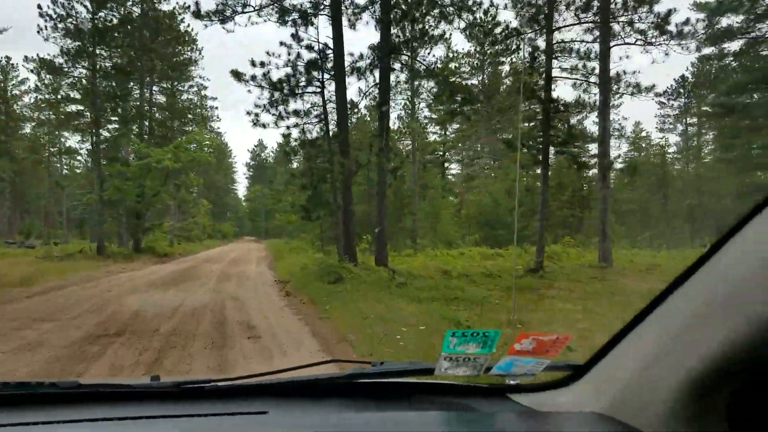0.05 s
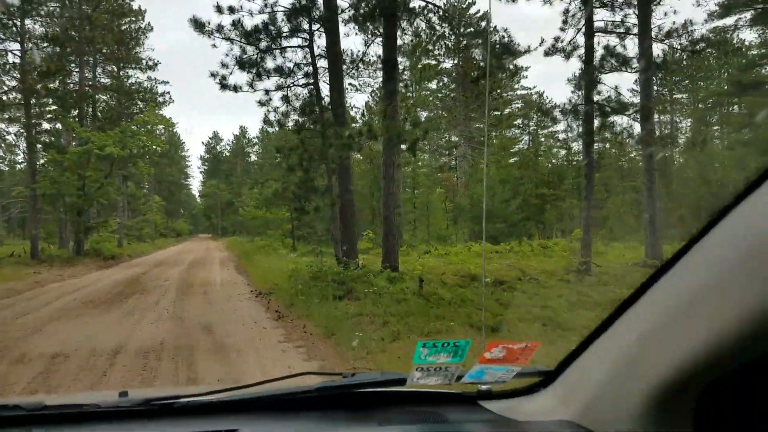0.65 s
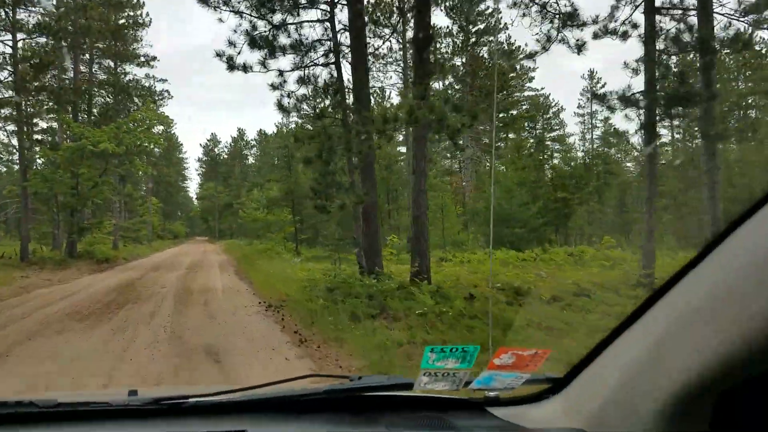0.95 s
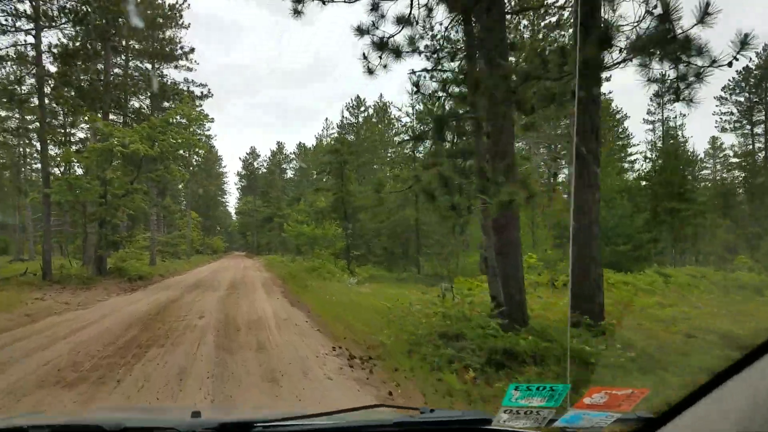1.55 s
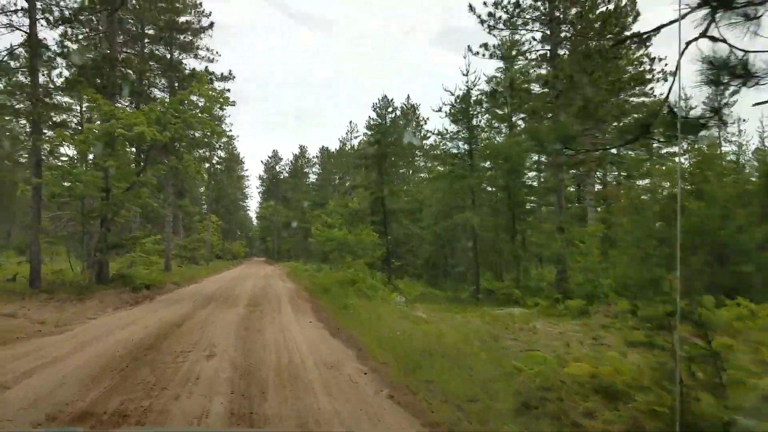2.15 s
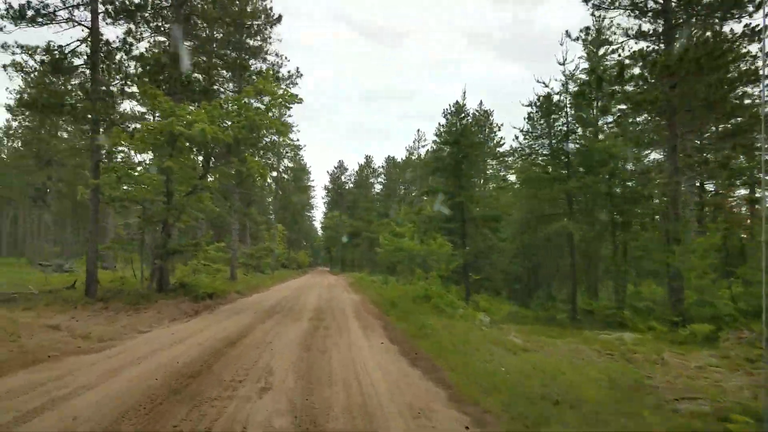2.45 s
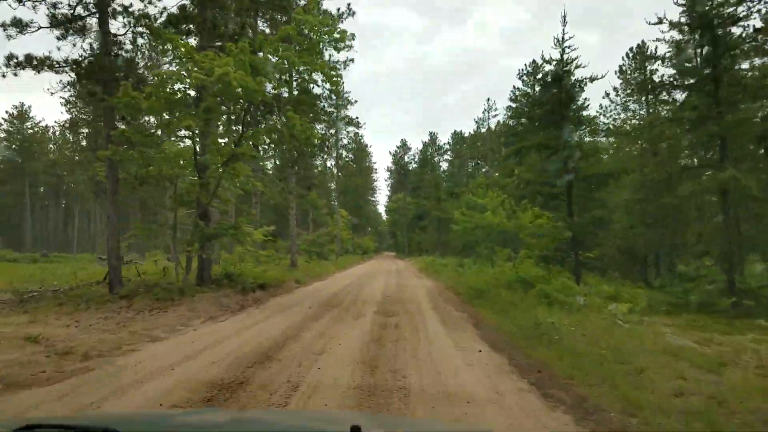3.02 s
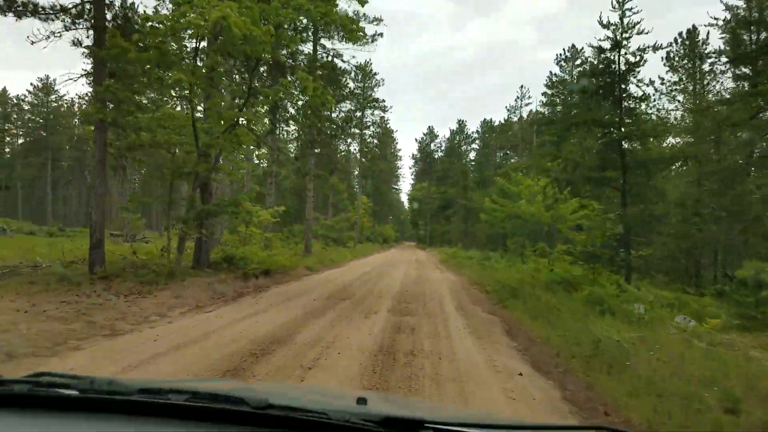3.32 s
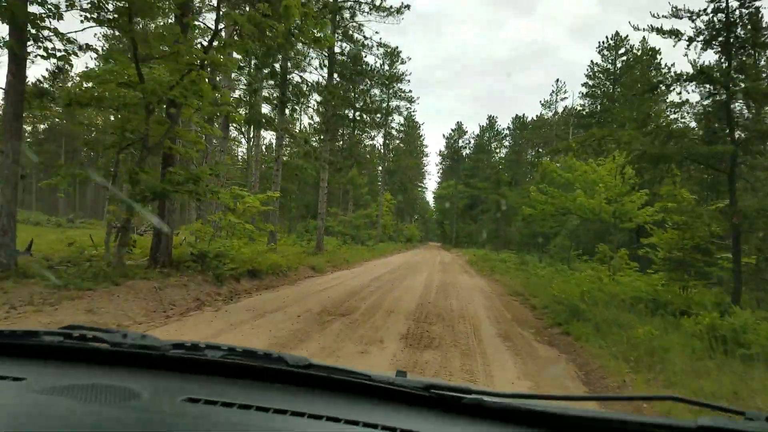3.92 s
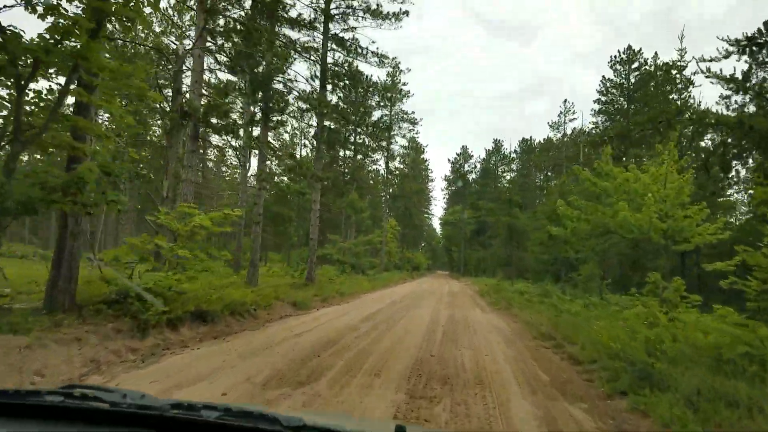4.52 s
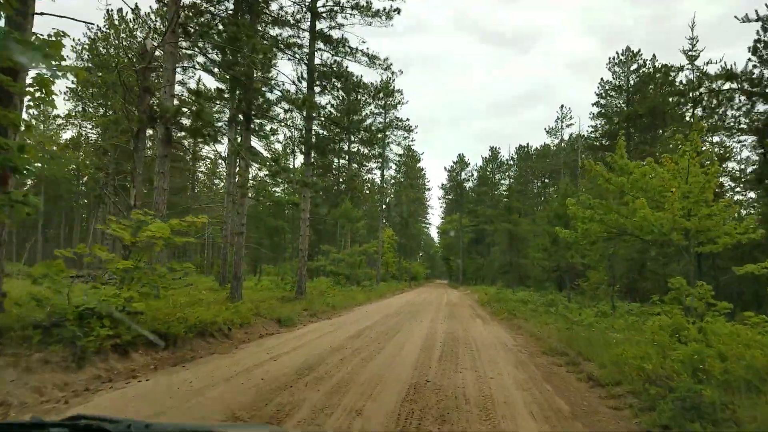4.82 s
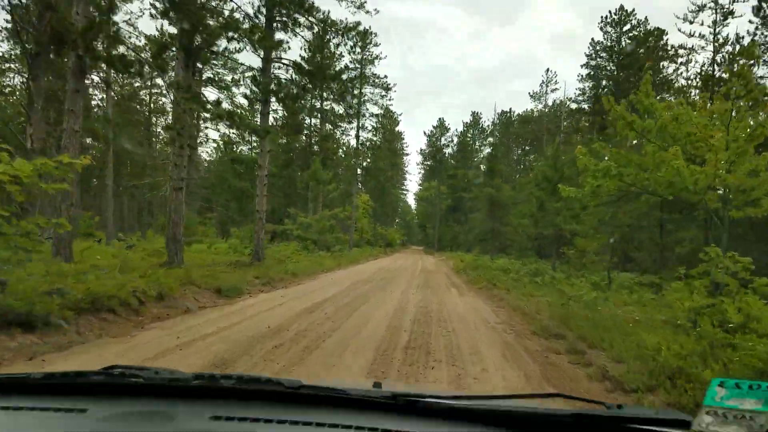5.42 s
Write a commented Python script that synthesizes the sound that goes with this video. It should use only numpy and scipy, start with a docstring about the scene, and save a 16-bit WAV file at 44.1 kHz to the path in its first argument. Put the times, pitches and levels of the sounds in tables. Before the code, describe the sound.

Heard from inside a moving car, a continuous low boom swells and dips as the tyres run over dirt and grit. Ruts thump through the body throughout, setting off brief plastic rattles and small ticks. The low drone is strongest in the first half, and a faint squeak comes near the middle. Later a loose panel knocks sharply a few times and small metal pieces clink softly. The microphone sits close behind the windscreen.

```python
"""Inside a car rolling along a rough dirt road, heard from a phone behind the windscreen.
The road forces the body into vibration and excites the cabin's air modes, which boom over the drive
train's drone; the tyres roar and crunch on grit. Bumps are impulses that thud and clunk through the
suspension. Loose trim knocks, rattles and squeaks, and small parts tick and clink over a faint hiss."""
import sys
import numpy as np
from scipy import signal
from scipy.fft import rfft, irfft
from scipy.io import wavfile

SR = 44100
rng = np.random.default_rng(int(sys.argv[2]) if len(sys.argv) > 2 else 0)


def dump_mix(stems):
    """Bounce the given channels to the path in sys.argv[1] as a 16-bit WAV at rate SR."""
    frames = np.atleast_2d(stems).T  # one column per channel
    limited = np.clip(frames, -1, 1)  # hard clip at full scale
    pcm = np.round(limited * 32767).astype(np.int16)
    wavfile.write(sys.argv[1], SR, pcm)


N = 250047
TIME = np.arange(N) / SR
FREQS = np.maximum(np.fft.rfftfreq(2 * N, 1 / SR), 1)
TOP_HZ = 15750

# How hard the road shakes the car. Each row: time in seconds, drive in dB.
ROAD_DRIVE = [(0, -28.5), (0.221, -20), (0.701, -26), (0.949, -25), (1.219, -23.5), (1.551, -25),
              (1.751, -22), (2.3, -19), (2.501, -22.5), (2.9, -20), (3.299, -24.5), (3.55, -27.5),
              (3.72, -19.5), (3.951, -24.5), (4.32, -20.5), (4.6, -25.5), (5.001, -26.5), (5.449, -32.5)]
# Dips in the road. Each row: time of the peak in seconds, relative level in dB, half length in seconds.
ROAD_DIPS = [(0.189, -20, 0.038), (0.309, -18, 0.0071), (0.466, -18.5, 0.027), (1.023, -19.5, 0.015),
             (1.074, -16, 0.0076), (1.382, -14, 0.024), (1.492, -10.5, 0.008), (1.631, -14.5, 0.009),
             (1.705, -14.0, 0.0095), (1.803, -12.5, 0.0067), (1.97, -13, 0.006), (2.092, -25, 0.0071),
             (2.18, -16, 0.011), (2.29, -11, 0.0044), (2.581, -16.5, 0.0079), (2.654, -12.5, 0.0087),
             (2.74, -13, 0.01), (2.791, -16, 0.0063), (2.914, -9, 0.0052), (2.98, -10.5, 0.0074),
             (3.13, -16, 0.0082), (3.263, -20.5, 0.026), (3.374, -17.5, 0.037), (3.68, -13, 0.024),
             (3.958, -13, 0.0064), (4.12, -15, 0.014), (4.239, -17, 0.0025), (4.365, -33, 0.0064),
             (4.42, -16.5, 0.012), (4.493, -14.5, 0.0058), (4.689, -11.5, 0.0079), (4.945, -20.5, 0.013),
             (5.081, -19.5, 0.0086), (5.359, -21, 0.022)]
# Tyres on dirt. Each row: time in seconds, relative levels of roar and of grit in dB.
TYRE_LEVELS = [(0, -52.5, -49), (.13, -50.5, -67.5), (.3, -49.5, -58.5), (0.741, -51, -64),
               (1.17, -49.5, -57), (1.37, -49.5, -63.5), (1.75, -48.5, -60.5), (2.45, -50.5, -63.5),
               (2.78, -47.5, -65), (3.199, -52, -65), (3.5, -50.5, -62), (3.75, -51.5, -61.5),
               (4.0, -53.5, -66), (4.28, -51, -58.5), (4.55, -52.5, -64), (4.72, -51.5, -61),
               (4.95, -53, -66), (5.249, -53, -61.5), (5.67, -54.5, -61)]
# Balance of the two microphones. Each row: frequency in Hz, left minus right in dB.
BALANCE = [(120, -2.5), (250, -1.6), (500, -2), (1000, -2.5), (2000, -4), (4500, -5.5), (8000, -1.5),
           (12000, 1.5)]


def cabin_boom():
    """Cavity resonance: the road excites air modes that throb with the drone and surge at each dip."""
    # The drive train's drone. Each row: time in seconds, pitch in Hz, share of the boom's power.
    drone_curve = [(0, 110, .3), (.9, 107, .15), (1.35, 108.5, .65), (1.65, 110, .55), (2.0, 107.5, .55),
                   (2.35, 107.5, .65), (2.7, 107, .3), (3.2, 106, .06), (5.67, 106, .04)]
    # Each row: frequency in Hz, width in Hz, gain in dB.
    air_modes = [(83.34, 23.04, 3.5), (99.4, 23.8, 0.5), (109.2, 12.5, -1), (131.1, 17.6, -10.5)]
    times, hz, shares = np.transpose(drone_curve)
    waver_hz, throb_db = 3.2, 2
    pitch = np.interp(TIME, times, hz) + waver_hz * walk(rate=16)
    drone = np.sin(2 * np.pi * np.cumsum(pitch) / SR)
    pan = by_freq(BALANCE)[0] ** np.array([[0.5], [-0.5]])
    air = steady(cabin(grains(rate=340, spread_db=1.5), resonances(air_modes)), span_s=0.94)
    share = np.interp(TIME, times, shares)
    ringing = steady(np.sqrt(1 - share) * air + np.sqrt(share) * unit(drone * pan), span_s=0.078)
    rolling = shaken(ROAD_DRIVE, level_db=-23, slope=0.91) * undb(throb_db * walk(rate=22))
    return ringing * np.hypot(rolling, swells(ROAD_DIPS))


def body_shudder():
    """Forced vibration: the uneven road heaves the body in its lowest modes."""
    # Each row: frequency in Hz, width in Hz, gain in dB.
    modes = [(18.6, 26.7, -8.5), (28, 9.4, 2.5), (34, 8, -5), (49.8, 7, -1.5)]
    # Each row: time in seconds, relative level in dB.
    levels = [(0, -28), (.3, -18), (.8, -28), (1.15, -19.5), (1.45, -25), (1.75, -19.5), (2.35, -24.5),
              (2.62, -22.5), (3.0, -27), (3.7, -20), (4.02, -26), (4.18, -17), (4.45, -22.5), (5.3, -26),
              (5.67, -31.5)]
    return undb(-0.7) * steady(cabin(noise(), resonances(modes)), span_s=0.88) * gains(levels)[0]


def floor_drumming():
    """Structure-borne sound: random road impacts drum on the floor, a little harder at dips."""
    # Each row: frequency in Hz, gain in dB.
    spectrum = [(100, -27.5), (135, 2.5), (150, 1), (162, -2), (180, 2), (225, -7), (270, -11), (400, -38)]
    drumming = steady(cabin(grains(rate=750, spread_db=2.5), colour(spectrum)), span_s=0.93)
    rolling = shaken(ROAD_DRIVE, level_db=-31.5, slope=0.99)
    return drumming * np.hypot(rolling, undb(-23) * swells(ROAD_DIPS))


def arch_thrum():
    """Forced vibration: the rolling tyres drive the wheel arches, which follow the level of the roar."""
    # Each row: frequency in Hz, gain in dB.
    spectrum = [(200, -33), (280, -0.5), (320, 1.5), (375, -1.5), (450, -6), (560, -12), (800, -27)]
    thrum = steady(cabin(grains(rate=1200, spread_db=2.5), colour(spectrum)), span_s=0.96)
    return thrum * shaken(TYRE_LEVELS, level_db=-43, slope=2)


def tyres():
    """Shot noise: tread pounds dirt and crushes grit, modulated by the road's ripples and lumps."""
    # Each row of both: frequency in Hz, gain in dB.
    roar_spectrum = [(380, -18.5), (560, 2), (720, 0.5), (900, -6), (1200, -9.5), (1600, -18.5),
                     (3000, -26.5)]
    grit_spectrum = [(800, -16.5), (1400, 6.5), (1900, 4.5), (2500, 3.5), (3100, -4.5), (4300, -12),
                     (5600, -29), (7200, -37.5), (14000, -42)]
    roar_gain, grit_gain = gains(TYRE_LEVELS)
    flutter_db = walk(rate=46) + walk(rate=11)  # ripples and lumps
    roar = unit(cabin(grains(rate=4000, spread_db=0), colour(roar_spectrum))) * undb(flutter_db)
    grit = unit(cabin(grains(rate=3500, spread_db=1.8), colour(grit_spectrum))) * undb(flutter_db / 2)
    return undb(2.5) * (roar * roar_gain + grit * grit_gain)


def rut_thuds():
    """Impulse response: each wheel that hits a rut rings the modes of the body."""
    # Each row: start in seconds, impulse in dB, contact time in seconds.
    bumps = [(.2, 2, 0.00093), (1.186, 6.5, 0.0013), (1.385, 5, 0.0007), (1.675, 2, .00083),
             (2.453, 7, 0.0013), (2.598, 7.5, 0.00067), (2.782, -3, 0.0022), (2.85, 5.5, 0.00061),
             (3.11, 12, 0.0022), (3.45, 9, 0.0021), (3.625, 4.5, 0.00055), (3.72, 10, 0.0035),
             (3.774, 9.5, 0.0057), (4.07, 10.5, 0.004), (4.193, 6.5, 0.0018), (4.226, 8.5, 0.0019),
             (4.27, 7, 0.002), (4.335, 0.5, 0.0025), (4.652, 4.5, .0022), (4.935, 5.5, 0.0014),
             (5.042, 5.5, 0.0018), (5.131, -0.5, .0012), (5.352, -0.5, 0.0013), (5.611, 10, 0.0029)]
    # Each row: frequency in Hz, width in Hz, gain in dB.
    modes = [(107, 52, 8), (170, 31, -0.5), (218, 13, 7), (258, 120, -2), (313, 42, 3), (390, 100, -11.5),
             (475, 300, -13.5), (700, 110, -19)]
    return strikes(bumps, resonances(modes), push)


def suspension():
    """Modal ringing: the suspension clunks in its own modes and jolts those of the hollow body."""
    # Each row of both: start in seconds, level in dB, 60 dB decay time in seconds.
    clunks = [(1.637, -25.5, 0.1), (1.725, -27.5, 0.039), (2.135, -31, 0.082), (2.453, -34.5, 0.074),
              (2.605, -34, .09), (2.703, -29, 0.062), (2.895, -29.5, 0.056), (3.628, -35, 0.16),
              (5.362, -31, 0.074)]
    jolts = [(.205, -41, 0.13), (1.372, -42, 0.064), (1.642, -37, .1), (2.138, -42, 0.083),
             (2.599, -37, .08), (2.842, -48.5, 0.046), (3.452, -37.5, .07), (4.1935, -24, 0.048),
             (4.216, -36.5, 0.044), (4.2935, -28, 0.034), (4.457, -43, 0.07), (4.634, -44, .06),
             (4.943, -47, 0.074), (5.352, -37.5, 0.061), (5.362, -37, 0.079)]
    # Each row of both: frequency in Hz, width in Hz, gain in dB.
    clunk_modes = [(288, 84, 0), (387, 26, 4), (434, 67, -9)]
    body_modes = [(415, 57, 6.5), (550, 110, -2.5), (652, 90, -2.5), (740, 130, -0.5), (890, 130, -4),
                  (1120, 320, -6)]
    return strikes(clunks, resonances(clunk_modes), slap) + strikes(jolts, resonances(body_modes), slap)


def gravel_spray():
    """Impact excitation: showers of gravel ring the liner of the wheel arch."""
    # Each row: start in seconds, level in dB, length in seconds.
    sprays = [(.17, -53.5, 0.15), (.27, -48.5, 0.13), (.64, -57, 0.021), (1.02, -50.5, 0.092),
              (1.14, -49.5, 0.1), (1.27, -51, 0.085), (1.6, -54, 0.076), (1.745, -53, .025),
              (2.598, -53, 0.012), (4.325, -50.5, 0.008), (4.69, -57.5, 0.058), (5.352, -46, 0.015)]
    # Each row: frequency in Hz, width in Hz, gain in dB.
    modes = [(804, 300, -5), (1010, 110, 3), (1330, 160, -5.5), (1760, 210, -12)]
    return strikes(sprays, resonances(modes), clatter)


def panel_knocks():
    """Plate vibration: a loose panel knocks, giving a broadband contact and a modal ring."""
    # Each row: start in seconds, level in dB, 60 dB decay time in seconds.
    knocks = [(.245, -45, 0.11), (.318, -40.5, 0.14), (.595, -40, 0.085), (1.098, -36.5, 0.063),
              (1.186, -44.5, 0.061), (2.225, -39.5, 0.092), (2.597, -43.5, 0.07), (4.194, -27.5, 0.018),
              (4.198, -22, 0.048), (4.2165, -38, 0.067), (4.295, -34.5, 0.025), (4.2995, -32, 0.028),
              (4.329, -35.5, 0.03), (5.071, -43, 0.06), (5.149, -43, .04), (5.354, -38.5, 0.09)]
    # The bare contact. Each row: frequency in Hz, gain in dB.
    spectrum = [(90, -14.5), (190, 21), (300, -10.5), (440, -2), (600, -8), (760, 4), (900, 2),
                (1180, -1.5), (1700, -10.5), (2300, -10.5), (2900, -34.5), (5000, -29), (7500, -46),
                (15000, -37)]
    # Each row: frequency in Hz, width in Hz, gain in dB.
    modes = [(200, 60, 12.5), (454, 150, 3), (710, 99, -7.5), (910, 170, -6), (1200, 230, -0.5),
             (1340, 220, -7), (1650, 170, -8), (1980, 180, -9), (2380, 220, -7.5)]
    return strikes(knocks, colour(spectrum), slap) + undb(-1.5) * strikes(knocks, resonances(modes), slap)


def cover_rattle():
    """Shell resonance: rapid contacts ring a hollow plastic cover."""
    # Each row: start in seconds, level in dB, length in seconds.
    bursts = [(1.035, -55, .02), (1.155, -58, 0.047), (2.18, -55, .055), (2.555, -65.5, .014),
              (2.625, -54.5, 0.042), (2.668, -53.5, 0.076), (2.726, -55, 0.014), (2.81, -57, 0.012),
              (2.88, -54.5, 0.015), (2.988, -51.5, 0.013), (3.147, -56, 0.022), (4.232, -62, .02),
              (4.34, -58, 0.008), (4.387, -52, 0.0067), (4.688, -57, 0.011), (4.757, -60, .02)]
    # Each row: frequency in Hz, width in Hz, gain in dB.
    modes = [(1390, 300, -1), (1940, 380, 3.5), (2140, 160, 3), (2420, 340, -4), (3240, 320, -14.5),
             (3620, 370, -10)]
    return strikes(bursts, resonances(modes), buzz)


def trim_chatter():
    """Intermittent contact: loose trim chatters in short broadband bursts."""
    # Each row: start in seconds, relative level in dB, length in seconds.
    bursts = [(.11, -58, 0.012), (.236, -56, 0.038), (.353, -54.5, 0.022), (.425, -62, 0.013),
              (1.093, -56, 0.024), (1.14, -57, 0.03), (1.24, -59, .02), (1.652, -53.5, 0.014),
              (1.739, -54, 0.019), (1.862, -64.5, 0.015), (2.207, -58.5, 0.024), (2.726, -58.5, 0.022),
              (3.567, -59, 0.0063), (3.718, -62, 0.012), (5.148, -57.5, 0.0058)]
    # Each row: frequency in Hz, gain in dB.
    spectrum = [(300, -29), (700, 0.5), (1300, 6), (1600, -1), (1950, -1.5), (2250, -3), (2600, -3.5),
                (3050, -4), (3600, -6), (4100, -15.5), (5500, -20.5), (7500, -30), (15000, -24.5)]
    return undb(5) * strikes(bursts, colour(spectrum), clatter)


def small_ticks():
    """High-frequency resonance: small hard parts tick, each at its own pitch."""
    # Each row: start in seconds, level in dB, length in seconds, ring frequency in Hz.
    ticks = [(.096, -67, .003, 4680), (.1116, -74, 0.0029, 4370), (.195, -74.5, 0.014, 13700),
             (.238, -73, 0.0088, 13000), (.318, -72, 0.0034, 10000), (.566, -76, .002, 13500),
             (.868, -73, 0.0084, 12500), (1.335, -75, .012, 5900), (1.444, -76, .0015, 12500),
             (1.722, -72, 0.0042, 5870), (1.736, -72, .008, 15000), (1.789, -72.5, 0.011, 13000),
             (1.82, -73.5, 0.006, 9950), (2.251, -74, .016, 11400), (2.66, -71, 0.046, 9640),
             (2.783, -73, .004, 12900), (3.338, -77, 0.013, 5100), (3.415, -74, 0.034, 12600),
             (3.567, -69, 0.0051, 6000), (3.638, -70, 0.014, 12200), (3.93, -74, 0.039, 11300),
             (3.995, -70, .038, 12800), (4.194, -61.5, 0.0053, 5500), (4.204, -66, 0.0085, 14300),
             (4.217, -75, 0.0032, 9500), (4.294, -68, 0.0051, 5470), (4.555, -74, 0.0088, 12200),
             (4.609, -71.5, 0.0056, 14000), (4.64, -73.5, 0.016, 12930), (5.082, -74, .005, 11900),
             (5.338, -70.5, .016, 13000)]
    # Each row: frequency in Hz, gain in dB.
    spectrum = [(1500, -20.5), (4300, 4), (6000, -4), (7500, -4), (10000, -4.5), (15500, -3)]
    return strikes(ticks, colour(spectrum), tick)


def metal_clinks():
    """Free vibration: small metal pieces jingle and ring down."""
    # Each row: start in seconds, level in dB, ring frequency in Hz, 60 dB decay time in seconds.
    clinks = [(1.708, -54, 2520, 0.093), (4.56, -71.5, 4750, .2), (4.614, -71, 4200, 0.14),
              (4.645, -65, 4480, .3), (4.662, -61, 3330, 0.29), (4.71, -68, 5582, .22),
              (4.74, -69, 4600, .2)]
    return strikes(clinks, np.ones_like(FREQS), ping)


def fitting_squeaks():
    """Friction: a rubbing fitting excites its narrow, high modes."""
    # Each row: start in seconds, level in dB, length in seconds.
    rubs = [(2.622, -68, 0.042), (2.657, -60.5, 0.04), (2.712, -66, 0.032)]
    # Each row: frequency in Hz, width in Hz, gain in dB.
    modes = [(4460, 150, 7), (4600, 130, -4.5), (5120, 220, -3), (6100, 500, -8.5)]
    return strikes(rubs, resonances(modes), buzz)


def hiss():
    """Filtered noise: a thin hiss sprinkled with tiny ticks, and one swish like sliding cloth."""
    # Each row: time in seconds, level in dB.
    hiss_levels = [(0, -63.5), (.75, -68), (1.25, -66.5), (1.97, -63), (2.45, -66), (3.2, -66.5),
                   (4.1, -63), (4.95, -69), (5.4, -61.5)]
    # Each row: frequency in Hz, gain in dB.
    spectrum = [(2000, 0), (5000, -2), (7400, -11), (8600, -6), (10000, -4.5), (13000, -1), (16000, -0.5)]
    # Each row: time of the peak in seconds, level in dB, half length in seconds.
    swish_swell = [(5.31, -67.5, 0.11)]
    # Each row: frequency in Hz, width in Hz, gain in dB.
    swish_modes = [(3540, 170, 0), (6300, 900, -6.5), (8600, 380, -2), (10600, 1100, -14.5)]
    air = unit(cabin(noise() + undb(-15.5) * grains(rate=10, spread_db=-2.5), colour(spectrum)))
    swish = unit(cabin(noise(), resonances(swish_modes)))
    return air * gains(hiss_levels)[0] + swish * swells(swish_swell)


def strikes(rows, response, contact):
    """Superposition: the contacts of all rows drive one response, scaled to unit power gain."""
    force = np.zeros((2, N))
    for start_s, db, *shape in rows:
        start = int(start_s * SR)
        t = TIME[:min(SR // 4, N - start)]
        force[:, start:start + len(t)] += undb(db) * contact(t, *shape)
    return cabin(force, response / np.sqrt(np.mean(np.abs(response) ** 2)))


def push(t, duration):
    """Contact time limits bandwidth: the longer this unit impulse lasts, the duller it sounds."""
    shove = t * np.exp(-4 * t / duration)
    return shove / shove.sum()


def slap(t, t60):
    """Reverberation: a sudden contact arrives directly, then scattered by the cabin's surfaces."""
    direct = signal.unit_impulse(len(t)) * np.eye(2, 1)
    scatter = rng.standard_normal((2, len(t))) * np.exp(-np.log(1000) * t / t60)
    return 7 * direct + 0.97 * scatter * (1 - np.exp(-t / 0.00023))


def buzz(t, length):
    """Random excitation: quick uneven contacts swell and stop, leaving a short cabin tail."""
    contacts = rng.standard_normal((2, len(t))) * (1.1 + 3.9 * (rng.random(len(t)) < 2500 / SR))
    swell = 1 - np.exp(-t / (0.23 * length))
    return contacts * swell * (np.exp(-(t / length) ** 2) + 0.5 * np.exp(-t / 0.02))


def clatter(t, length, rate=600, ring_s=0.0011):
    """Amplitude modulation: random decaying pulses break a buzz into separate uneven ticks."""
    chance, size = rng.random((2, len(t)))
    contacts = (chance < rate / SR) * (0.26 + size) ** 2
    pulses = signal.lfilter([1], [1, -np.exp(-1 / (ring_s * SR))], contacts)
    return buzz(t, length) * unit(pulses + 0.25 * pulses.mean())


def tick(t, length, hz):
    """A damped resonator: a short buzz rings one small part."""
    contacts = buzz(t, length)
    ring = signal.lfilter(*signal.iirpeak(min(hz, TOP_HZ), Q=7, fs=SR), contacts)
    return 2 * contacts + 4.6 * ring


def ping(t, hz, t60, split_hz=28):
    """Beating: scraped metal rings in two close modes, slightly detuned at each contact."""
    pitch = hz * (1 + 0.0025 * rng.standard_normal((2, 1)))
    main, twin = (np.sin(2 * np.pi * (f * t + rng.random((2, 1)))) for f in (pitch, pitch + split_hz))
    scrape = signal.lfilter(*signal.iirpeak(hz, Q=7, fs=SR), buzz(t, 0.012))
    envelope = np.exp(-np.log(1000) * t / t60) * (1 - np.exp(-t / 0.0005))
    return (main + 0.4 * twin) * envelope + 1.2 * scrape


def cabin(force, response):
    """Spatial coherence: two forces ring a part; bass reaches both microphones alike, treble diffusely."""
    # Each row: frequency in Hz, side minus mid in dB.
    stereo_width = [(30, -29), (120, -17.5), (250, -11.5), (500, -7), (1000, 0), (2000, 0.5), (10000, 0)]
    mid, side = rfft(force, 2 * N) * response
    width, lean = by_freq(stereo_width), np.sqrt(by_freq(BALANCE))
    left, right = (mid + width * side) * lean, (mid - width * side) / lean
    return irfft(np.array([left, right]) / np.sqrt(1 + width ** 2))[:, :N]


def resonances(modes):
    """Modal sum: steep-sided resonances add with alternating signs."""
    return sum((-1) ** k * undb(db) / (1 + 1j * (FREQS ** 2 - hz ** 2) / (FREQS * 2 * width)) ** 2
               for k, (hz, width, db) in enumerate(modes))


def colour(points):
    """Minimum-phase response with this spectrum, falling away beyond its ends."""
    skirts = (1 + (points[0][0] / FREQS) ** 2) * (1 + (FREQS / points[-1][0]) ** 2)
    cepstrum = irfft(np.log(by_freq(points) / skirts))
    return np.exp(rfft(2 * cepstrum[:N], 2 * N) - cepstrum[0])


def by_freq(points):
    """Gain interpolated over log frequency from (Hz, dB) points."""
    hz, db = np.transpose(points)
    return undb(np.interp(np.log(FREQS), np.log(hz), db))


def gains(table):
    """One gain per sample for each dB column of a curve."""
    times, *columns = np.transpose(table)
    return [undb(np.interp(TIME, times, db)) for db in columns]


def shaken(curve, level_db, slope):
    """Power law: the gain moves about level_db by slope dB per dB of the curve's first level column."""
    drive = np.interp(TIME, *np.transpose(curve)[:2])
    return undb(level_db + slope * (drive - drive.mean()))


def swells(rows):
    """Gain of Gaussian swells that add in power."""
    return np.sqrt(sum((undb(db) * np.exp(-((TIME - peak_s) / half_s) ** 2 / 2)) ** 2
                       for peak_s, db, half_s in rows))


def steady(x, span_s):
    """Hold a vibration's running rms near 1, keeping beats faster than the span."""
    window = np.hanning(int(span_s * SR))
    power = signal.fftconvolve(np.mean(x, axis=0)[None] ** 2, window[None], mode="same")
    return unit(x / np.sqrt(power + 0.015 * power.mean()))


def grains(rate, spread_db):
    """A Poisson process: impacts of uneven strength, at a mean rate per second."""
    impacts = noise() * (rng.random(N) < rate / SR)
    return unit(impacts * undb(spread_db * np.minimum(rng.exponential(size=N), 5)))


def walk(rate):
    """Random wandering, with so many turns a second."""
    knots = rng.standard_normal(4096)
    return 1.632 * np.interp(TIME * rate, np.arange(len(knots)), knots)


def noise():
    """Two uncorrelated white noises."""
    return rng.standard_normal((2, N))


def undb(db):
    """Decibels to gain."""
    return 10 ** (np.asarray(db) / 20)


def unit(x):
    """Scale to rms 1."""
    return x / np.sqrt(np.mean(x ** 2))


def scene():
    """Superposition: the pressures of all sources add in the cabin."""
    rolling = cabin_boom() + body_shudder() + floor_drumming() + arch_thrum() + tyres()
    impacts = rut_thuds() + suspension() + gravel_spray()
    trim = panel_knocks() + cover_rattle() + trim_chatter()
    small_parts = small_ticks() + metal_clinks() + fitting_squeaks()
    return rolling + impacts + trim + small_parts + hiss()


def record(dry):
    """Saturation and band limiting: the phone rounds the highest peaks and cuts the top."""
    rounded = np.tanh(0.77 * dry) / 0.77
    return signal.sosfilt(signal.ellip(10, 0.1, 80, TOP_HZ, fs=SR, output="sos"), rounded)


dry = scene()
out = record(dry)
dump_mix(out)
```